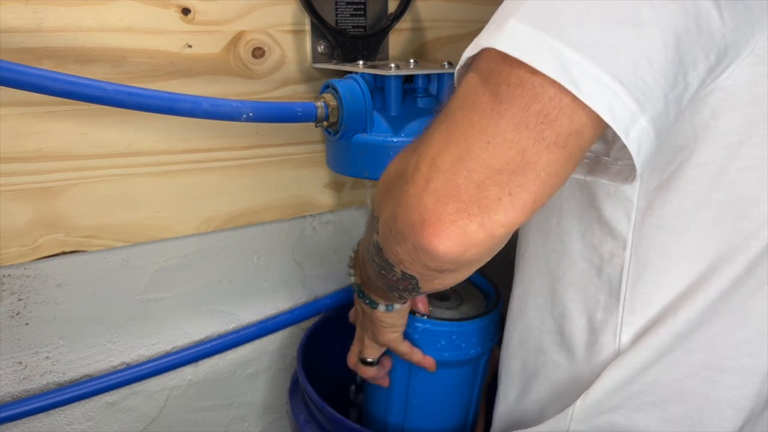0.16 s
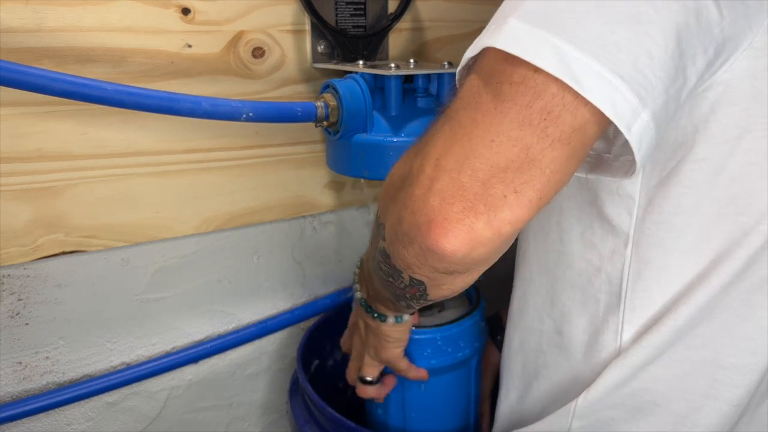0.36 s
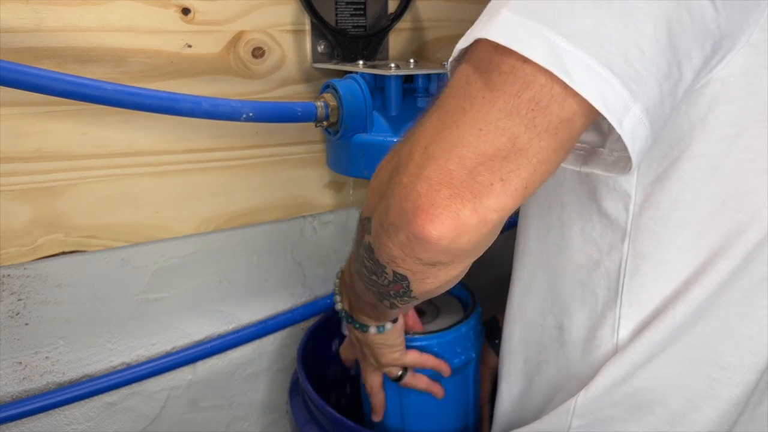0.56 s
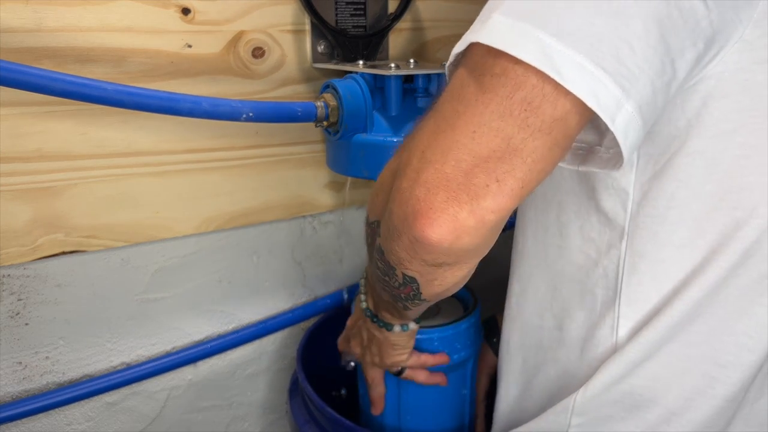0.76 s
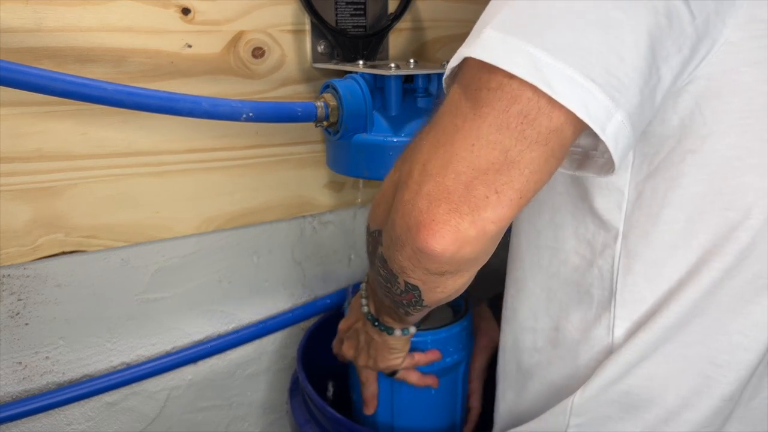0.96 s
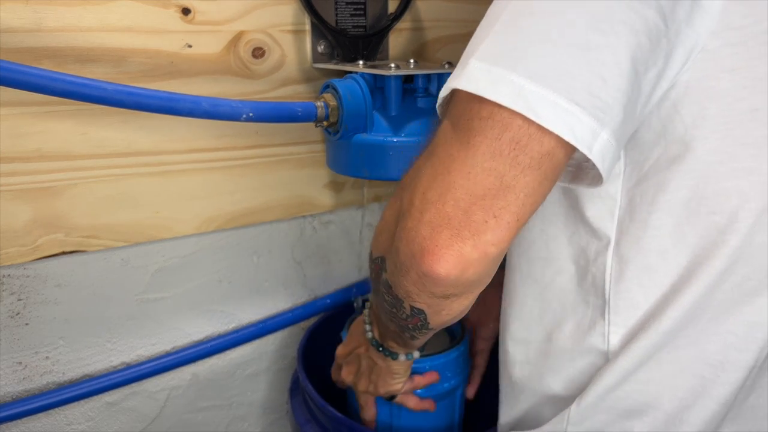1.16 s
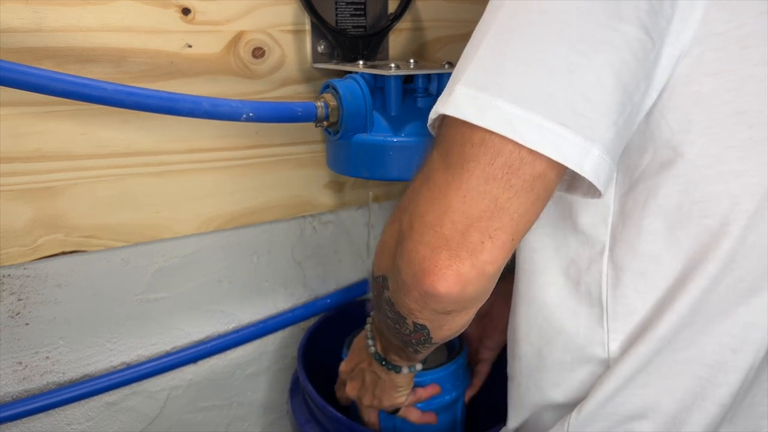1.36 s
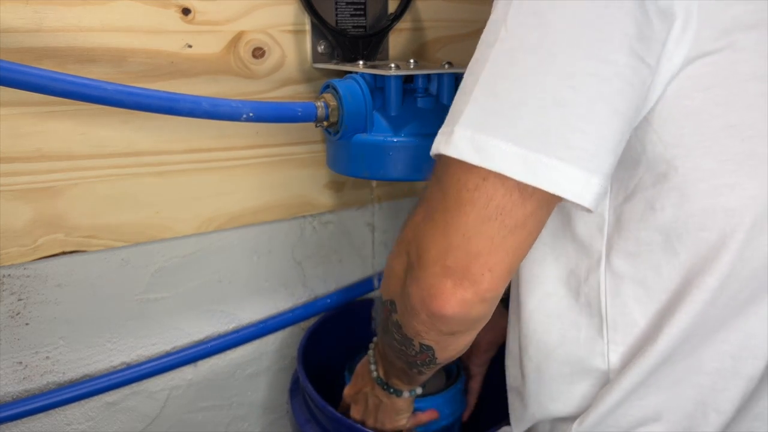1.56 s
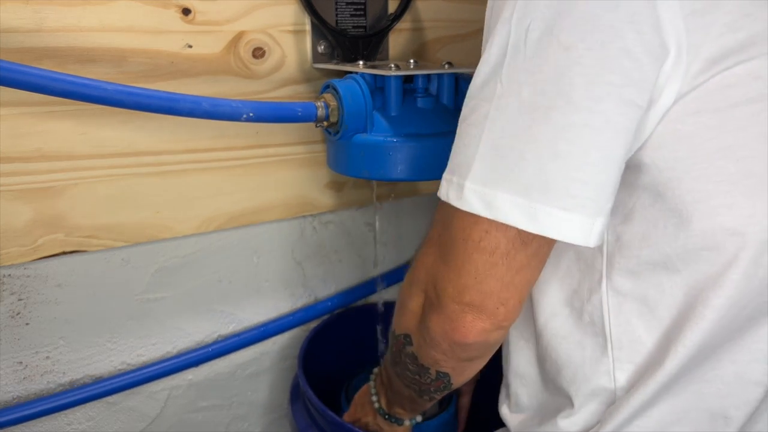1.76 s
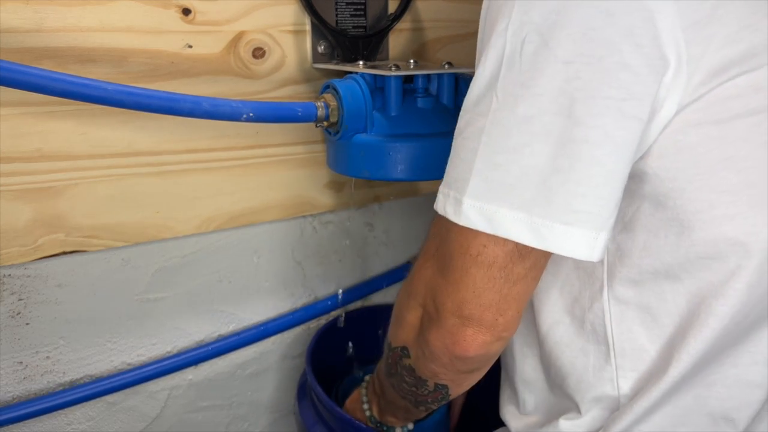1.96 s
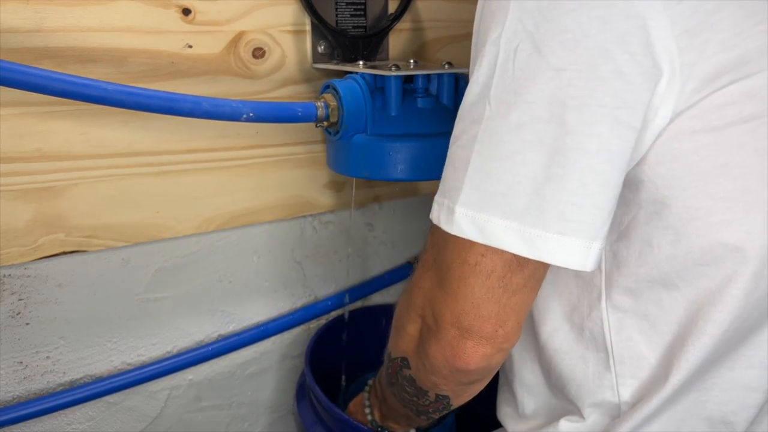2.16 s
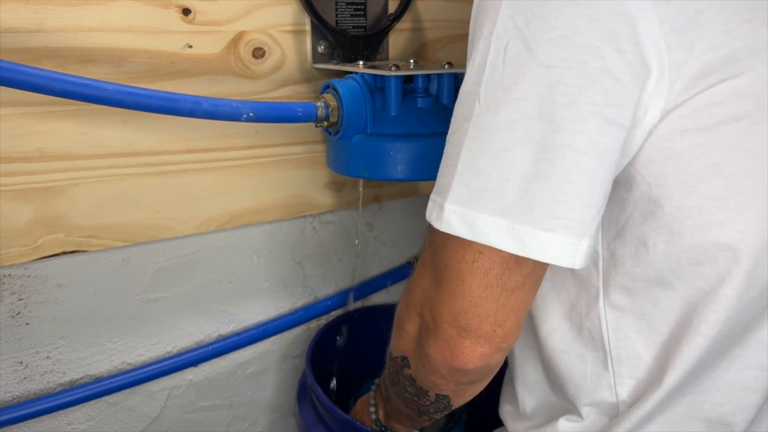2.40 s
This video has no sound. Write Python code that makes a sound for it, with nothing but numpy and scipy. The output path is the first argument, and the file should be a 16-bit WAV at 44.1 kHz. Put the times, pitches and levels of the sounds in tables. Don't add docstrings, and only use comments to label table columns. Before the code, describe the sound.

Thin water dribble splashing in a plastic bucket, fading before one hollow thump and a few last drips

```python
import sys
import numpy as np
from scipy import signal
from scipy.fft import rfft, irfft
from scipy.io import wavfile
from scipy.ndimage import uniform_filter1d

SR = 44100
rng = np.random.default_rng(int(sys.argv[2]) if len(sys.argv) > 2 else 0)


def persist_wave(psi):
    counts = np.round(np.clip(psi, -1, 1) * 32767).astype(np.int16)
    wavfile.write(sys.argv[1], SR, np.atleast_2d(counts).T)


def volts_from_decibels(level):
    exponent = np.asarray(level, float) / 20
    return 10 ** exponent


N = 107339

# time_s, level_db
STREAM_LEVEL = [(0, -41), (.1, -52.5), (.19, -57.5), (.3, -45), (.45, -45.5), (.6, -53.5), (.7, -48),
                (.82, -53), (1.1, -47), (1.3, -51), (1.45, -64), (1.66, -58), (1.9, -44.5), (2.07, -64),
                (2.2, -60), (2.43, -69)]
# time_s, gain_db
FIZZ_GAIN = [(0, 1), (.1, -7), (.25, 5), (.45, -5.5), (.6, 3), (.9, 1), (1.2, -1.5), (1.4, 4), (1.6, 2.5),
             (1.8, -2), (1.93, 0.5), (2.15, 3.5), (2.3, 1), (2.43, -7)]
# pitch_hz, level_db
SPRAY_TONE = [(300, 10), (700, 3), (1500, -0.5), (3300, -7), (6000, -8.5), (10000, -8.5), (13500, -7),
              (16300, -8.5)]
# time_s, level_db
DRUM_LEVEL = [(0, -49.5), (.27, -55), (.34, -42.5), (.44, -48), (.51, -40.5), (.65, -49), (.84, -44.5),
              (1.0, -45), (1.13, -54.5), (1.22, -51.5), (1.3, -61), (2.43, -70)]
# pitch_hz, width_hz, level_db
WET_BOTTOM_HUMS = [(200, 37.5, -2.5), (245, 27, -8), (117.1, 13, -9)]
# start_s, peak_db, centre_hz, mist_db
DROP_SPLATS = [(0.0233, -29, 3560, -67), (0.121, -33, 7560, -55), (0.1446, -25, 7100, -49),
               (0.2003, -31.5, 6900, -43.5), (.212, -32, 7160, -65), (0.2625, -42, 8150, -39),
               (0.3351, -21.5, 4200, -44), (0.3452, -12, 4440, -49), (0.3535, -54, 5380, -36.5),
               (0.442, -24.5, 5000, -56), (0.5405, -46, 7060, -40.5), (0.6547, -36.5, 5370, -38.5),
               (0.748, -63, 6000, -37), (0.837, -29, 5060, -36.5), (0.9354, -32, 5000, -46.5),
               (1.0007, -26.5, 6440, -45), (1.0796, -27.5, 4300, -43.5), (1.1331, -26.5, 6500, -45),
               (1.3352, -35.5, 8400, -58), (1.465, -37.5, 8600, -47), (1.535, -38.5, 7000, -65),
               (1.563, -39, 6400, -70.5), (1.62, -49.5, 7540, -55), (1.893, -34, 6600, -72),
               (1.9429, -32, 7000, -49.5), (1.9947, -35, 6040, -43.5), (2.047, -69, 6070, -50),
               (2.0937, -51.5, 3050, -52), (2.2519, -37, 6840, -52)]
# start_s, peak_db, pitch_hz
BUBBLES = [(0.004, -43, 770), (0.02, -32, 1580), (0.124, -32, 2020), (0.436, -34.5, 2340),
           (0.459, -35.5, 1815), (0.705, -33.5, 1017), (0.82, -37, 876), (0.94, -30, 852),
           (1.038, -33.5, 752), (1.111, -37, 2360), (1.151, -31.5, 962), (1.224, -33, 1318),
           (1.306, -38, 848), (1.604, -41.5, 1703), (1.639, -39.5, 1090), (1.945, -39.5, 600),
           (2.121, -45, 960)]
# start_s, peak_db, pitch_hz
SMALL_BUBBLES = [
    (0.203, -42, 2600),
    (0.443, -28, 5810),
    (0.45, -57, 6230),
    (.478, -40.5, 6030),
    (0.511, -42.5, 3270),
    (0.612, -40, 4400),
    (0.905, -41, 2760),
    (1.895, -37.5, 3510),
    (1.921, -44, 3340),
]
# start_s, peak_db, pitch_hz
DROPLETS = [(0.0267, -34, 1600), (0.0524, -29, 4200), (0.0825, -39, 1030), (0.2127, -34, 1860),
            (0.2352, -31, 4260), (0.2706, -34, 1580), (0.3003, -42, 1220), (0.6923, -34, 980),
            (0.76, -31, 1580), (0.835, -32, 1350), (0.9777, -31.5, 2020), (1.0013, -28.5, 4130),
            (1.062, -39, 2630), (1.0787, -31, 1000), (1.094, -38, 1130), (1.151, -28.5, 1740),
            (1.197, -35, 1360), (1.2594, -41, 1310), (1.287, -38, 1140), (1.3454, -37, 2500),
            (1.3588, -35, 1950), (1.5486, -41, 1070), (1.5842, -41, 1570), (1.8711, -26.5, 2030),
            (2.0038, -38.5, 2170), (2.0428, -38, 2140), (2.1577, -45, 1750)]
# start_s, level_db, pitch_hz, fade_60db_s
POOL_RINGS = [
    (0, -35.5, 651.4, 0.16),
    (0, -38.5, 709, 0.23),
    (.005, -45, 1543, 0.083),
    (0.019, -40, 1582, 0.057),
    (1.152, -25.5, 1760, 0.021),
    (1.226, -48, 1365, .14),
    (1.895, -50.5, 3500, 0.096),
]
# start_s, level_db, centre_hz, fade_60db_s
POOL_SLOSHES = [
    (0, -44.5, 640, 0.77),
    (0.333, -38, 1090, 0.31),
    (1.151, -29.5, 1430, 0.037),
    (1.226, -40.5, 1190, 0.13),
    (1.358, -49.5, 1740, 0.17),
    (1.548, -46, 1490, 0.09),
    (1.999, -46, 1290, 0.07),
]
# pitch_hz, level_db
MAINS_HUM = [(59.5, -52.5), (119, -51.5)]
# pitch_hz, level_db
AIR_TONE = [(25, -43.5), (60, 6.5), (170, -10.5), (260, -1.5), (700, -23), (3000, -57), (9600, -27.5),
            (16300, -24)]
# start_s, level_db, pitch_hz, fade_60db_s
BUCKET_NUDGES = [(0.309, -37, 210, 0.24), (0.346, -31.5, 262, 0.24), (0.578, -31, 269.4, 0.19),
                 (0.712, -39, 268.4, 0.32), (.72, -42.5, 422, 0.31), (.775, -40.5, 433, 0.37),
                 (.335, -38, 527, .2), (1.148, -33, 431.6, 0.11), (1.608, -41, 218, 0.17),
                 (1.77, -36.5, 84, 0.36), (2.164, -47.5, 215, 0.33), (2.324, -41.5, 260.4, 0.21)]
# strongest_s, force (below zero lets go)
CANISTER_PUSHES = [
    (1.7042, .64),
    (1.7234, .46),
    (1.7489, -.31),
    (1.7575, .13),
    (1.8002, .067),
    (1.8219, -.08),
]
# pitch_hz, level_db, fade_60db_s
BOTTOM_TONES = [(167.2, -22.4, .47), (207, -8.5, .25), (244.5, -3.5, .245), (272.5, -22, 1.4)]
# pitch_hz, level_db, fade_60db_s
WALL_TONES = [(365, -2, .09), (442, -3, .08), (553, -6, .07), (604, -1, .09), (887, -3, .05),
              (935, -12, .03), (969, -4, .05), (1040, -8, .04), (1309, -5, .04), (1460, -3, .04),
              (2077, 0, .035), (2250, -5, .03), (3200, -5, .025)]
# start_s, ring_db, crack_db, favoured_hz
CANISTER_KNOCKS = [
    (1.684, -27, -49, 3170),
    (1.692, -21.5, -37, 990),
    (1.7209, -12.5, -18.5, 1700),
    (1.73, -14, -37, 483),
    (1.749, -20, -36, 500),
    (1.774, -17.5, -34.5, 1000),
    (1.796, -23, -33.5, 950),
]
# pitch_hz, fade_60db_s
ROOM_FADE = [(200, 0.59), (2000, 0.19), (9000, 0.2)]
# pitch_hz, level_db
ROOM_TONE = [(150, -22), (300, -15), (700, -6), (1000, -5), (1500, -2), (4000, -1), (5800, 0), (8600, -2),
             (9300, -40), (10700, -40), (11300, -2), (12300, -38), (14400, -38), (15500, 0)]
# pitch_hz, difference_db
PORT_LEAN = [(100, 0), (300, -1.5), (1200, -.8), (5000, 5), (8000, 0)]
# pitch_hz, lead_half_turns
PORT_LEAD = [(300, 0), (3000, .3), (5300, .75), (6500, -.06), (8000, -.4), (8900, -.7), (9250, -.98),
             (10750, -1.02), (11100, -1.3), (12300, -2), (14400, -2), (15700, -2.65)]


def evened(x):
    return x / np.sqrt(np.mean(x ** 2) + 1e-20)


def read(points, hz):
    f, value = np.transpose(points)
    return np.interp(np.log(hz + 1), np.log(f + 1), value)


def curve(points):
    return volts_from_decibels(np.interp(np.arange(N) / SR, *np.transpose(points)))


def coloured(x, points):
    gain = volts_from_decibels(read(points, np.fft.rfftfreq(x.shape[-1], 1 / SR)))
    return irfft(rfft(x) * gain, x.shape[-1])


def add(mix, s, sound):
    part = mix[max(round(s * SR), 0):][:len(sound)]
    part += sound[:len(part)]


def resonate(x, hz, width):
    r = np.exp(-np.pi * width / SR)
    return 2 * signal.lfilter([1 - r], [1, -r * np.exp(2j * np.pi * hz / SR)], x).real


def band(noise, hz, width):
    for _ in range(3):
        noise = resonate(noise, hz, width)
    return noise


def slow(size):
    return evened(uniform_filter1d(uniform_filter1d(rng.standard_normal(N), size), size))


def ring(db, hz, t60, glide=0., rise_s=0.0012):
    t = np.arange(0, t60 + 0.0081, 1 / SR)
    fade = volts_from_decibels(db - 60 * t / t60) * np.minimum(t / rise_s, 1)
    return fade * np.sin(2 * np.pi * hz * (t + glide * t * t))


def burst(db, noise, t60, rise_s):
    t = np.arange(len(noise)) / SR
    return volts_from_decibels(db - 60 * t / t60) * np.minimum(t / rise_s, 1) * evened(noise)


def drops(per_s, spread_db):
    size = volts_from_decibels(spread_db * np.minimum(rng.exponential(1, N), 5))
    return size * (rng.random(N) < per_s / SR) * rng.choice([-1, 1], N)


def stream():
    bubbles = np.zeros(N)
    for hz in np.geomspace(450, 15500, 36):
        per_s = 37.0 + hz / 60.0
        grain = ring(read(SPRAY_TONE, hz), hz, 40.0 / hz, hz / 119.5, 0.57 / hz)
        patches = volts_from_decibels(4 * slow(size=2500))
        bubbles += patches * signal.oaconvolve(drops(per_s, 2.8), grain * hz / np.sqrt(per_s))[:N]
    hiss = evened(coloured(rng.standard_normal(N), SPRAY_TONE))
    water = 0.77 * evened(bubbles) + 0.74 * hiss
    fizz = coloured(water, [(2500, -40), (5000, 0)])
    water += (curve(FIZZ_GAIN) * volts_from_decibels(2.8 * slow(size=700)) - 1) * fizz
    return curve(STREAM_LEVEL) * volts_from_decibels(2.6 * slow(size=900)) * water


def drumming():
    swell = np.sqrt(2) * volts_from_decibels(2 * slow(size=900))
    column_hz = 177 * (1 + 0.0048 * slow(size=1500))
    sound = swell * np.sin(2 * np.pi * np.cumsum(column_hz) / SR)
    push = drops(600.0, 2.2)
    for hz, width, db in WET_BOTTOM_HUMS:
        sound += volts_from_decibels(db) * evened(resonate(resonate(push, hz, 2 * width), hz, width))
    return curve(DRUM_LEVEL) * sound


def drips():
    out = np.zeros(N)
    for s, db, hz, mist_db in DROP_SPLATS:
        spray, mist = rng.standard_normal((2, 3000))
        add(out, s, burst(db - 11.5, band(spray, hz, 0.8 * hz), 0.058, 0.00026))
        add(out, s, burst(mist_db + 5, band(mist, 14400, 9200), 0.035, 0.00079))
    for s, db, hz in [*BUBBLES, *SMALL_BUBBLES]:
        splash = band(rng.standard_normal(2000), hz, 1500)
        add(out, s, burst(db - 11, splash, 0.045, 0.0006))
        add(out, s, ring(db, hz, 0.018 + 24.4 / hz, 400.0 / hz, 2 / hz))
    for s, db, hz in DROPLETS:
        add(out, s - .001, ring(db - 1.5, hz, 18.4 / hz, 3, 2.2 / hz))
    for s, db, hz, t60 in POOL_RINGS:
        add(out, s, ring(db, hz, t60, rise_s=0.0016))
    for s, db, hz, t60 in POOL_SLOSHES:
        add(out, s, burst(db, band(rng.standard_normal(9000), hz, 1.36 * hz), t60, 0.0068))
    return out


def background():
    t = np.arange(N) / SR
    out = volts_from_decibels(-58.5) * evened(coloured(rng.standard_normal(N), AIR_TONE))
    for hz, db in MAINS_HUM:
        out += volts_from_decibels(db - 5.5) * np.sin(2 * np.pi * hz * t)
        waver = evened(resonate(rng.standard_normal(N), hz, 12.0))
        out += volts_from_decibels(db - 25.0) * waver
    return out


def nudges():
    out = np.zeros(N)
    for s, db, hz, t60 in BUCKET_NUDGES:
        add(out, s, ring(db, hz, t60, rise_s=0.014))
    return out


def canister_thump():
    out = np.zeros(N)
    push_s = .0125
    t = np.arange(-push_s, .6, 1 / SR)
    rise = np.sin(np.pi / 2 * np.clip(t / push_s + 1, 0, 1)) ** 2
    settling = volts_from_decibels(-500 * np.maximum(t - .17, 0) ** 2)
    boom = np.zeros(len(t))
    for hz, db, t60 in BOTTOM_TONES:
        boom += volts_from_decibels(db - 60 * np.maximum(t, 0) / t60) * np.cos(2 * np.pi * hz * t)
    for s, force in CANISTER_PUSHES:
        add(out, s - push_s, force * rise * settling * boom)
    return out


def canister_knocks():
    out = np.zeros(N)
    for s, db, crack_db, spot_hz in CANISTER_KNOCKS:
        for hz, tone_db, t60 in WALL_TONES:
            where = rng.standard_normal()
            octaves_away = abs(np.log2(hz / spot_hz))
            tone = ring(db + tone_db - 5 * octaves_away, hz * (1 + .005 * where), t60, rise_s=0.0032)
            add(out, s, np.sign(where) * tone)
        noise = rng.standard_normal(4000)
        add(out, s, burst(crack_db, 0.61 * band(noise, 1400, 4850) + 0.5 * noise, 0.11, 0.0011))
    return out


def room(x):
    taps = np.zeros((2, SR // 2))
    at = np.arange(120, SR // 2 - 20, 20)
    places = at + rng.integers(0, 20, (2, len(at)))
    np.put_along_axis(taps, places, rng.choice([-1., 1.], (2, len(at))), 1)
    hz, t, z = signal.stft(taps, SR, nperseg=256)
    fade = volts_from_decibels(-60 * t / read(ROOM_FADE, hz)[:, None])
    tail = signal.istft(z * fade, SR, nperseg=256)[1]
    echo = signal.fftconvolve(x[None], tail / np.linalg.norm(tail[0]), axes=1)
    return coloured(echo[:, :N + 4097], ROOM_TONE)[:, :N]


def scene():
    x = stream() + drumming() + drips() + background() + nudges() + canister_thump() + canister_knocks()
    hz = np.fft.rfftfreq(N + 1, 1 / SR)
    half = volts_from_decibels(read(PORT_LEAN, hz) / 2) * np.exp(.5j * np.pi * read(PORT_LEAD, hz))
    both = rfft(x + room(x), N + 1) * [half, 1 / half]
    return volts_from_decibels(0.5) * irfft(both, N + 1)[:, :N]


def low_pass(x):
    return signal.sosfilt(signal.butter(12, 16460, fs=SR, output="sos"), x)


def record(dry):
    heard = coloured(dry, [(22, -16), (45, 0), (15700, 0), (15700 * 1.02, -32), (15700 * 1.04, -55)])
    ceiling = 2.8
    return low_pass(ceiling * np.tanh(heard / ceiling))


dry = scene()
out = record(dry)
persist_wave(out)
```